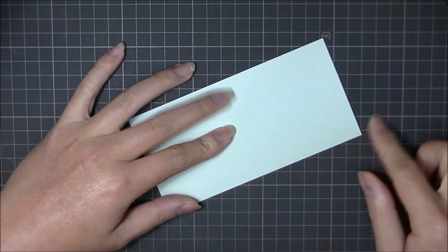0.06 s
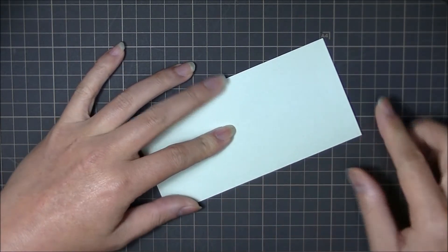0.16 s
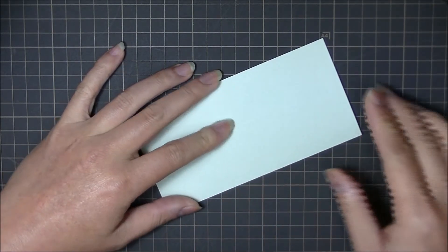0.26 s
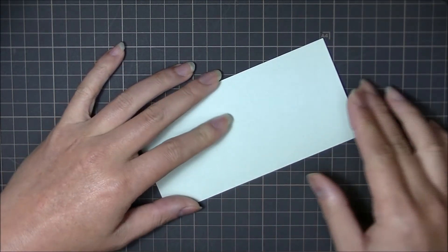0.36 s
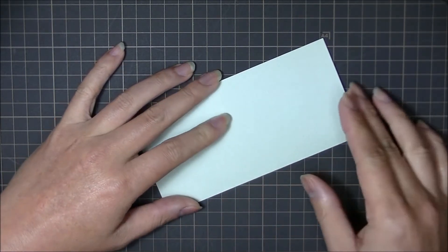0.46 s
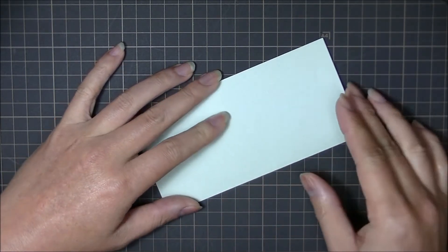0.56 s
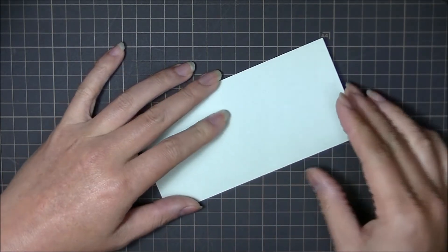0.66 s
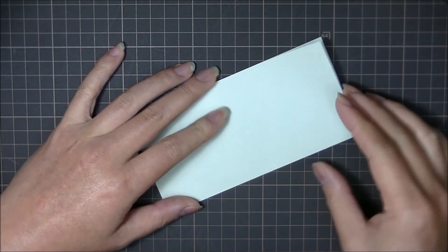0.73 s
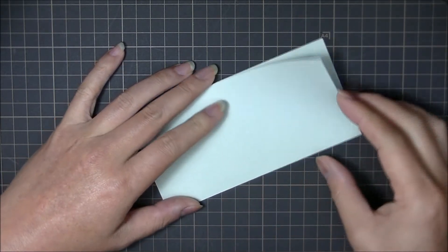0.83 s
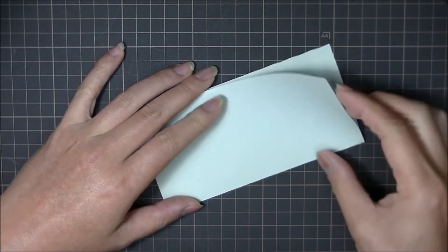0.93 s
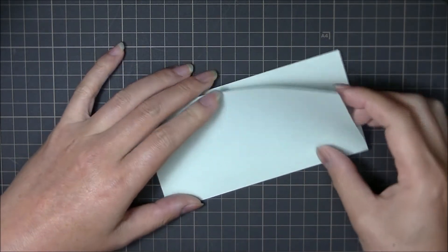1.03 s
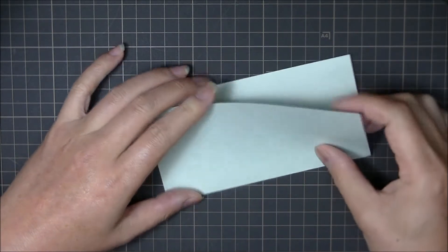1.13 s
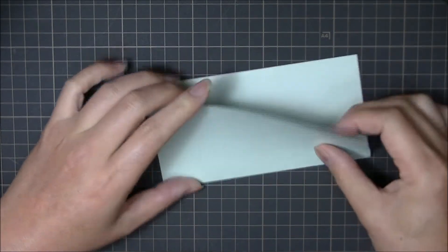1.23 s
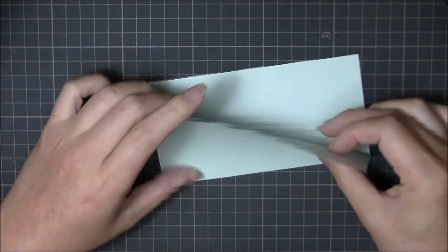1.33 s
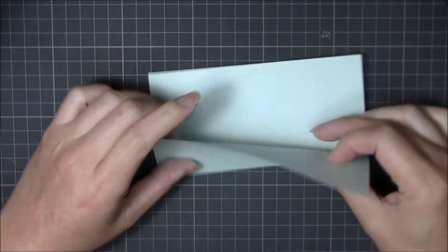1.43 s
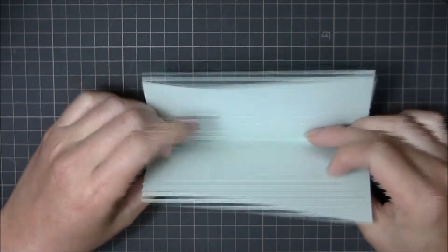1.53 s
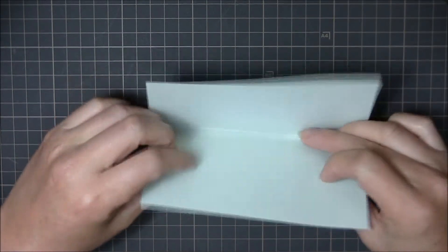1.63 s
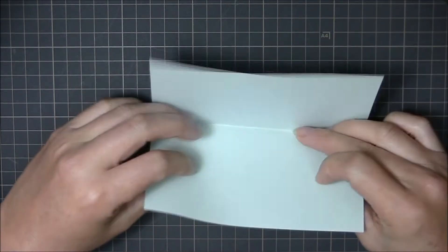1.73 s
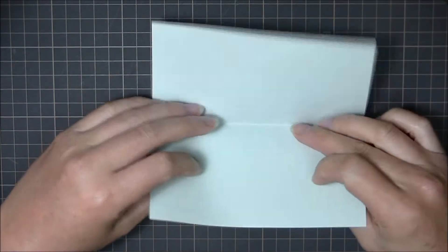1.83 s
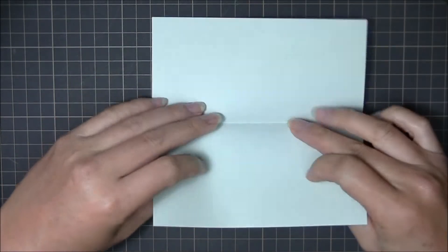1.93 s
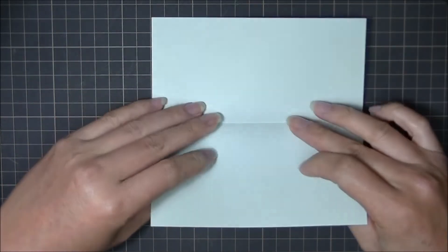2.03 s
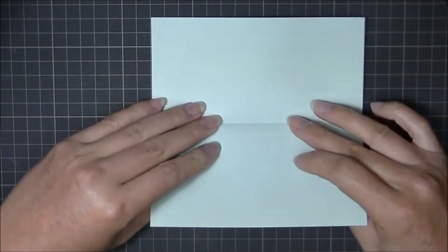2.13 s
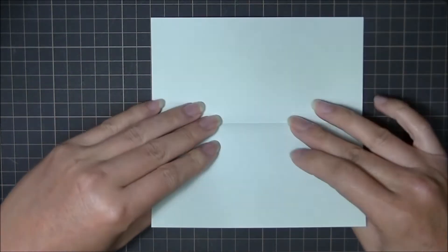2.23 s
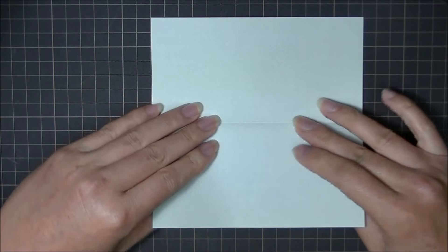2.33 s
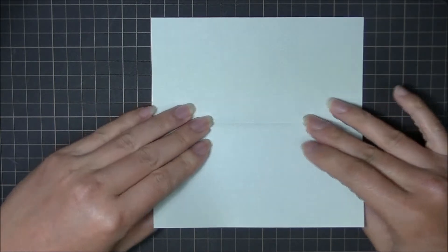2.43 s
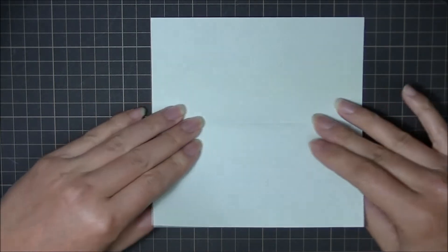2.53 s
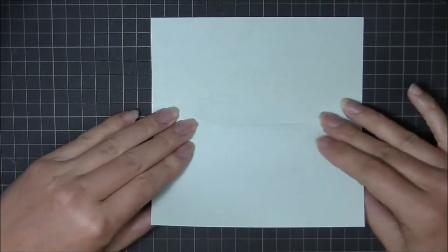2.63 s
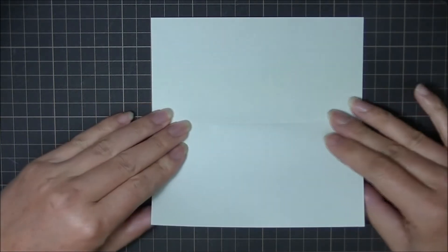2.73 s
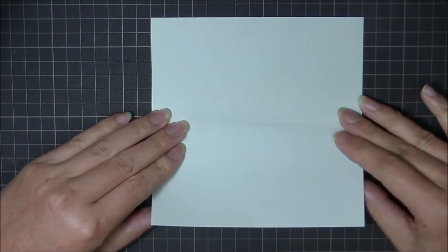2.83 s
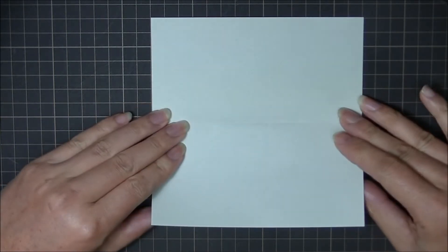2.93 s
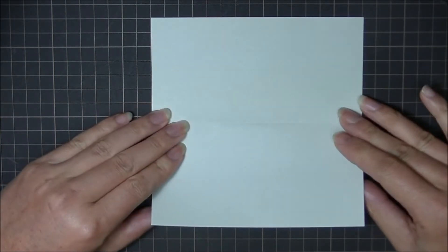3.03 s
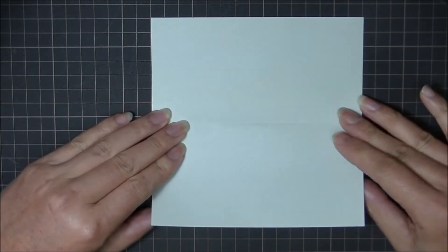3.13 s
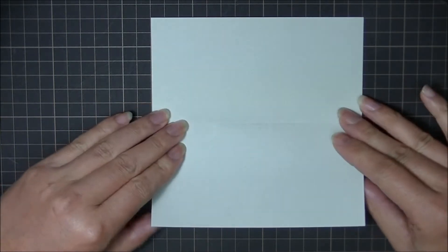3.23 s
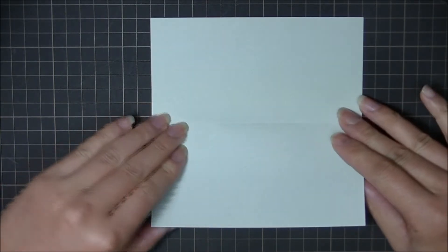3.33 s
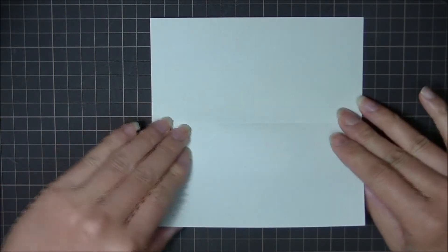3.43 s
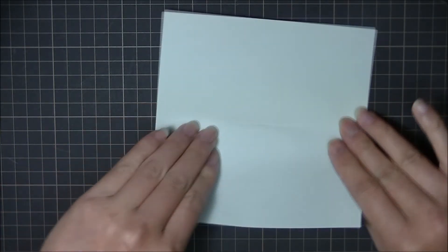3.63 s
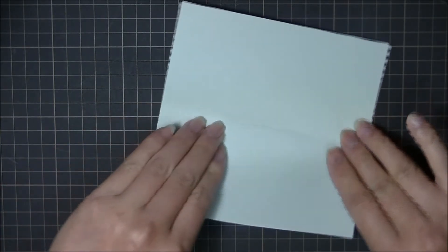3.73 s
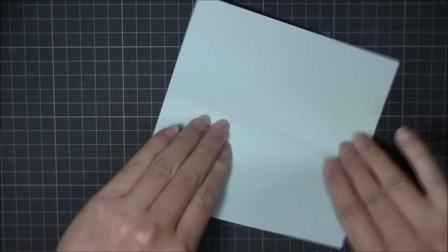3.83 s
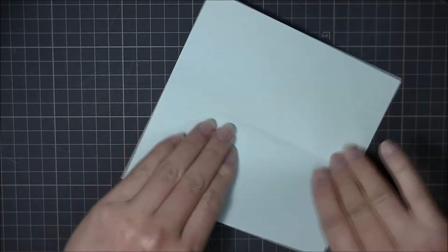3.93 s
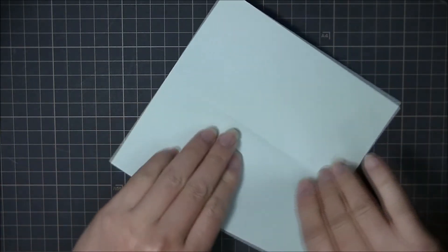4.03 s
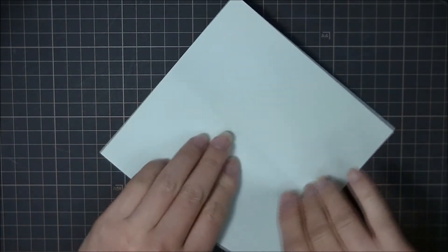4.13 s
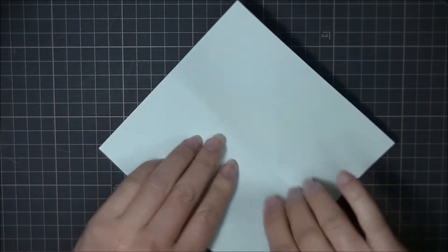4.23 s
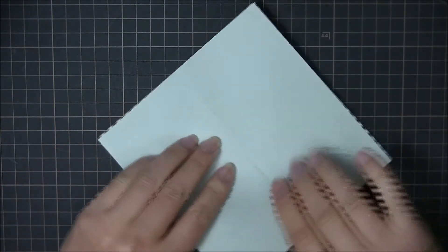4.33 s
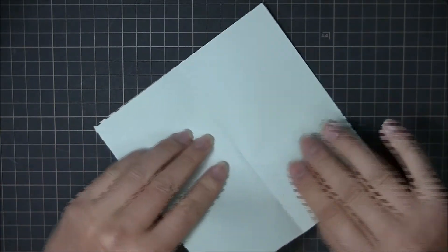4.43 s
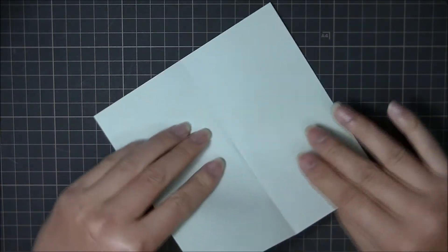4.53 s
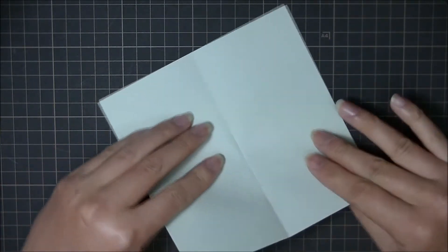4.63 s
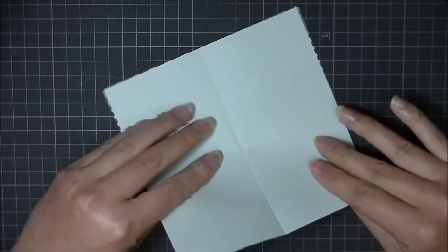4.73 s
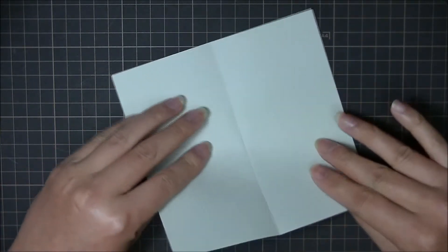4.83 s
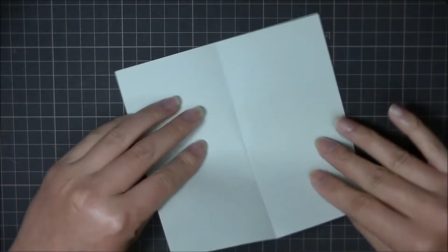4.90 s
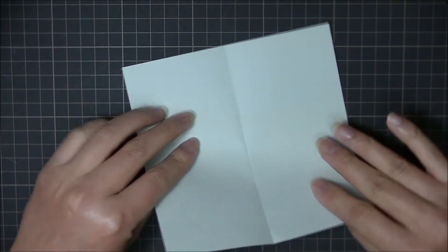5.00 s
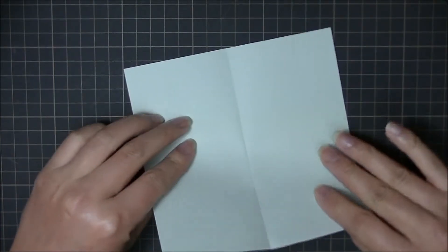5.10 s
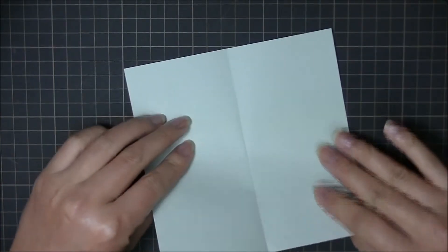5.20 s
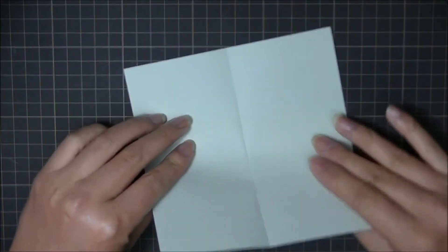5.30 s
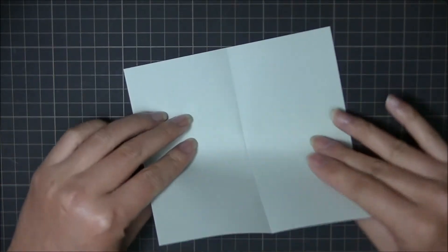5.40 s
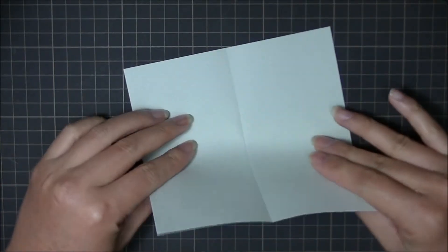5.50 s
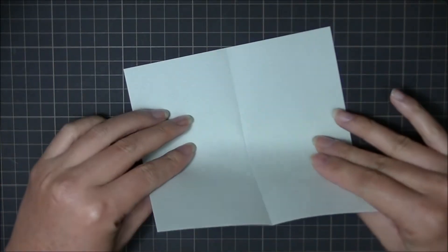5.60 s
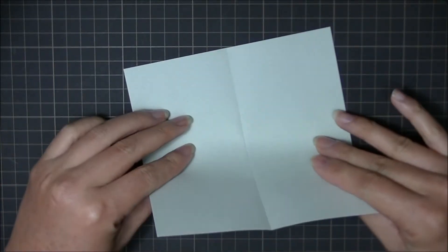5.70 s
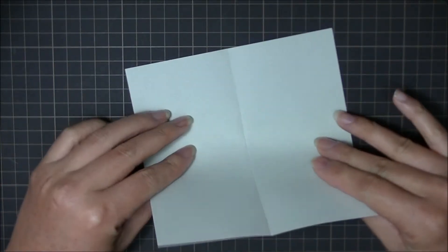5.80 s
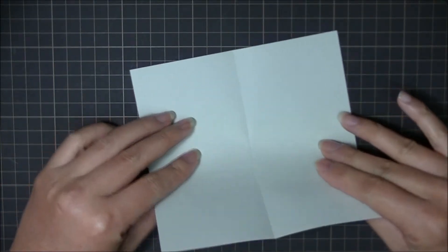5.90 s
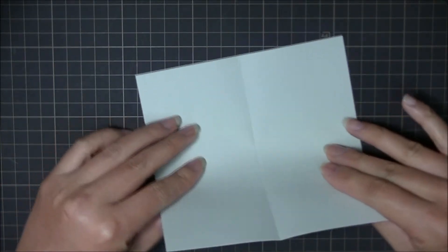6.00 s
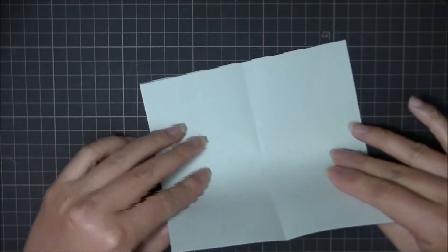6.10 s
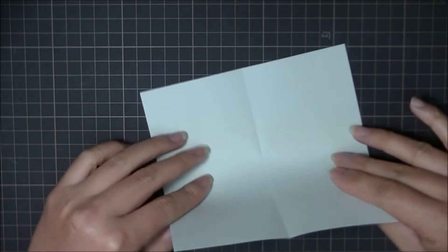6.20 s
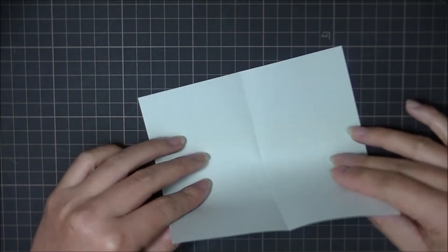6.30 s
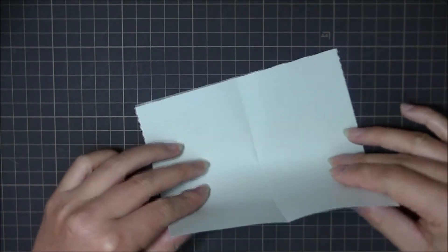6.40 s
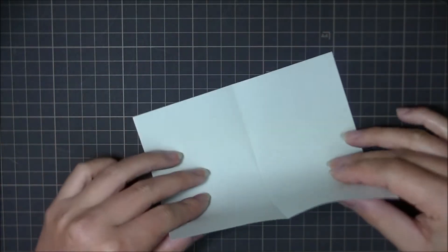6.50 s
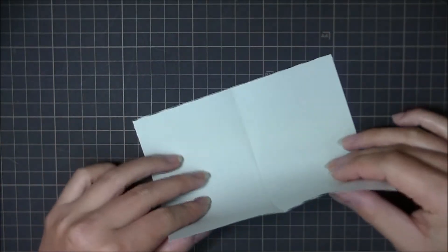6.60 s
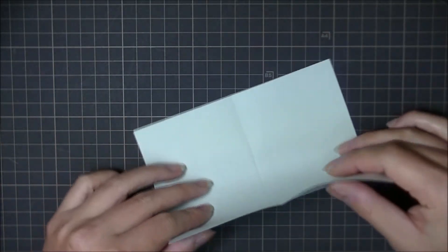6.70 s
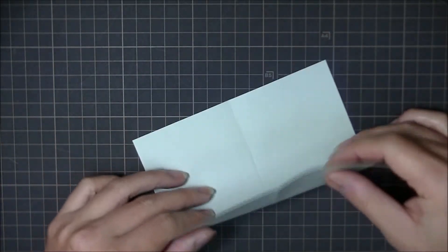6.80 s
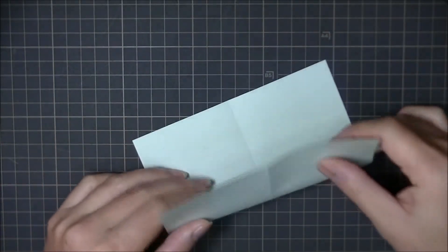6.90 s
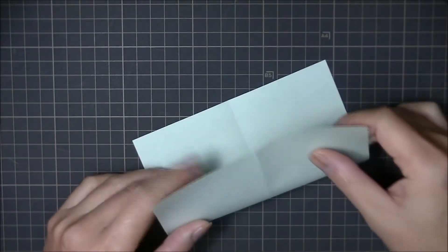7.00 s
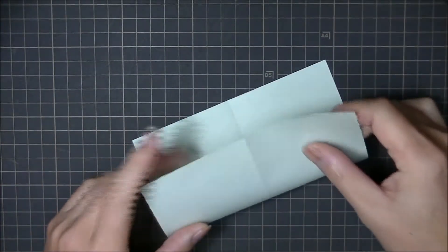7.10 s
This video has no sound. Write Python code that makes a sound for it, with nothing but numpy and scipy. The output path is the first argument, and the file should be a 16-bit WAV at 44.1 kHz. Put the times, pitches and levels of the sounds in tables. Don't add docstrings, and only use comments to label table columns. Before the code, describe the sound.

Crisp paper is rubbed, opened, turned on a mat and lifted to fold, rustling and crackling between soft pauses of microphone hiss.

```python
import sys
import numpy as np
from scipy import signal
from scipy.fft import rfft, irfft, next_fast_len
from scipy.io import wavfile
from scipy.ndimage import uniform_filter1d

SR = 44100
rng = np.random.default_rng(int(sys.argv[2]) if len(sys.argv) > 2 else 0)


def decibels_to_gain(level_db):
    exponent = np.asarray(level_db, float) / 20
    return 10 ** exponent


def to_wav(s):
    ch = np.atleast_2d(s).T
    pcm = np.round(np.clip(ch, -1, 1) * 32767)
    wavfile.write(sys.argv[1], SR, pcm.astype(np.int16))


N = 315315
SIZE = next_fast_len(N + 8192)
FREQ = np.maximum(np.arange(SIZE // 2 + 1) * SR / SIZE, 1)
USUAL_RASP_DB = -48


def rubbing(path):
    layer_edges = [1000, 2300, 6300]
    s, layers_db, rasp_hz, hiss_hz = strokes()
    sound = rfft(through(slips(count=N, spread_db=1.5), path), SIZE)
    power = np.abs(sound) ** 2 * 2 / SIZE / N
    layer_of = np.searchsorted(layer_edges, FREQ)
    time = np.arange(N) / SR
    step = np.log2(FREQ / 200) * 4
    grip = 0.29 * walk(30) + 0.63 * walk(90)
    out = 0
    for k in range(26):
        centre = np.searchsorted(step, k)
        layer = layer_of[centre]
        db = layers_db[layer] - 10 * np.log10(power[layer_of == layer].sum())
        lightness = np.clip(USUAL_RASP_DB - layers_db[2], -10, 20)
        span_peak = np.exp(-(np.log2(FREQ[centre] / rasp_hz) / 0.49) ** 2)
        db = db + (7.0 + 0.096 * lightness) * span_peak
        db = db + 6.6 * np.exp(-(np.log2(FREQ[centre] / hiss_hz) / 0.3) ** 2)
        db = db - 4.62 * (layer > 1)
        part = irfft(sound * np.clip(1 - np.abs(step - k), 0, 1), SIZE)[:N]
        flicker = 1.4 * walk(7) + 0.89 * walk(25)
        out = out + part * decibels_to_gain(np.interp(time, s, db) + grip + flicker)
    return out


def strokes():
    # (top [s], rasp [dB], rise [s], fall [s], press [dB])
    smoothing = [
        (0.123, -62, 0.011, 0.014, 6),
        (0.253, -53, 0.039, 0.05, 1),
        (.42, -62, 0.27, 0.13, 4),
        (.85, -69, 0.25, 0.45, -5),
    ]
    # (top [s], rasp [dB], rise [s], fall [s], press [dB])
    unfolding = [(1.04, -47, 0.02, 0.14, -8.5), (1.155, -45, 0.048, 0.079, -4.5),
                 (1.265, -46, 0.08, 0.059, -1.5), (1.39, -40, 0.038, 0.026, -2),
                 (1.49, -52.5, 0.049, 0.031, 6.5), (1.538, -39.5, 0.023, .05, 3),
                 (1.575, -38.5, 0.027, .025, 0), (1.615, -53.5, .02, 0.04, 12),
                 (1.703, -49, 0.033, .008, 2.5), (1.742, -40.5, 0.0098, 0.013, 8.5),
                 (1.80, -53.5, 0.046, 0.089, 5), (1.93, -49, 0.33, 0.048, -4),
                 (2.052, -46, 0.082, 0.045, 1), (2.13, -53, 0.044, 0.091, 2)]
    # (top [s], rasp [dB], rise [s], fall [s], press [dB])
    flattening = [
        (2.42, -58, 0.05, 0.18, -5),
        (2.55, -56, 0.21, 0.15, -10.5),
        (2.78, -62.5, 0.17, 0.14, -5.5),
    ]
    # (top [s], rasp [dB], rise [s], fall [s], press [dB])
    turning = [
        (3.6, -51, 0.093, .12, -11),
        (3.74, -50.5, 0.11, 0.095, 4),
        (3.95, -47.5, 0.22, 0.32, 1),
        (4.108, -40, 0.16, .1, -2.5),
        (4.295, -46.5, 0.057, 0.055, 5),
        (4.46, -48, 0.094, 0.12, 5),
        (4.58, -48.5, 0.062, 0.04, 5),
        (4.70, -44.5, 0.14, 0.062, 0.5),
    ]
    # (top [s], rasp [dB], rise [s], fall [s], press [dB])
    lifting = [(5.87, -60, 0.05, 0.16, 5.3), (6.07, -44.5, 0.12, 0.16, 2.4), (6.3, -50, .08, 0.092, 1.03),
               (6.49, -47.5, 0.099, 0.068, 4.9), (6.67, -53.5, 0.029, 0.14, 9),
               (6.761, -43.5, 0.045, 0.047, 3.8), (6.81, -48.5, 0.04, 0.034, 9.2),
               (6.915, -55.5, 0.068, 0.055, 4), (6.2, -50.5, 0.031, 0.062, 8.8),
               (6.59, -58.5, .03, 0.04, 10)]
    # (top [s], rasp [dB], rise [s], fall [s], press [dB])
    nudging = [
        (3.285, -61, 0.033, 0.085, -4),
        (3.39, -55, 0.035, 0.051, -8),
        (3.47, -54.5, 0.022, 0.14, -5),
    ]
    # (top [s], rasp [dB], rise [s], fall [s], press [dB])
    raising = [
        (7.07, -60.5, 0.12, .08, 0),
        (7.125, -58.5, 0.053, 0.027, 0),
    ]
    # (top [s], rasp [dB], rise [s], fall [s], press [dB])
    settling = [
        (4.85, -50, 0.068, 0.12, -2),
        (5.0, -52, 0.072, 0.23, 0),
        (5.24, -55.5, 0.18, 0.066, -0.21),
        (5.38, -62.5, 0.057, 0.11, 0.26),
        (5.56, -68, 0.12, 0.2, 0),
    ]
    # (table hum [dB], sheet flex [dB], skin hiss [dB], hiss centre [Hz], roundness of the top [1])
    voices = [
        (-58, -56.5, -61, 9000, 1.6),
        (-63, -52.5, -60.5, 7800, 1),
        (-63, -51, -55.5, 10800, 1.9),
        (-66, -54, -56, 7840, 1.35),
        (-62.5, -54, -57.5, 9500, 1.39),
        (-67, -57.5, -67, 9500, 1),
        (-62, -50, -51, 10500, 1.5),
        (-63.5, -53.5, -55, 9500, 1.27),
    ]
    # (time [s], rasp centre [Hz])
    free_span = [(0, 3470), (.25, 2950), (.52, 3960), (.9, 4330), (1.02, 3400), (1.39, 3770), (1.6, 3050),
                 (1.71, 3840), (1.76, 2980), (2.6, 3400), (3.4, 3000), (3.6, 3540), (4.2, 3660),
                 (4.7, 3180), (4.86, 3680), (5.15, 3040), (6.9, 3600), (7.1, 4200)]
    # (gap [s], depth [dB], drop [s], return [s])
    lulls = [(1.012, 5, 0.027, .002), (1.292, 3, .003, .03), (1.965, 2, .008, .025), (2.615, 4, .008, .015),
             (3.425, 6, .004, .03), (4.318, 9, .003, .012), (4.615, 5.5, 0.0073, 0.0073),
             (4.945, 3, 0.012, 0.011), (5.14, 3, 0.025, .008), (5.31, 4, .004, 0.027),
             (5.836, 8, .03, .002), (1.43, 4, .004, .03), (4.235, 3, 0.011, 0.011)]
    s = np.arange(0, N / SR + .002, .002)
    power = np.full((4, len(s)), 1e-12)
    hiss_pull = 1e-12 * 9000
    gestures = (smoothing, unfolding, flattening, turning, lifting, nudging, raising, settling)
    for rows, (hum_db, flex_db, hiss_db, hiss_hz, roundness) in zip(gestures, voices):
        for top, rasp_db, rise, fall, press_db in rows:
            away = np.abs(s - top) / np.where(s < top, rise, fall)
            effort = rasp_db - USUAL_RASP_DB - 10 * away ** roundness
            hum = hum_db + 0.71 * effort + 0.98 * press_db
            flex = flex_db + 0.96 * effort + 0.98 * press_db
            rasp = USUAL_RASP_DB + effort
            skin = hiss_db + 0.95 * effort
            layers = decibels_to_gain(2 * np.array([hum, flex, rasp, skin]))
            power = power + layers
            hiss_pull = hiss_pull + layers[3] * hiss_hz
    lull_db = 0
    for at, db, drop, back in lulls:
        lull_db = lull_db + db * np.exp(-((s - at) / np.where(s < at, drop, back)) ** 2)
    rasp_hz = np.interp(s, *np.array(free_span).T)
    return s, 10 * np.log10(power) - lull_db, rasp_hz, hiss_pull / power[3]


def patchy(x, spread_db):
    cells = signal.stft(x, nperseg=1024)[2]
    patch = uniform_filter1d(rng.standard_normal(cells.shape), size=3, axis=0)
    patch = uniform_filter1d(patch, size=3, axis=1)
    gain_db = spread_db * (patch / patch.std() - spread_db * np.log(10) / 20)
    return signal.istft(cells * decibels_to_gain(gain_db), nperseg=1024)[1][:N]


def scrapes(path):
    # (top [s], peak [dB],
    # centre [Hz], rise [s], fall [s])
    edge_drags = [(1.030, -35, 3420, 0.0011, 0.014), (1.043, -35.5, 3870, 0.0065, 0.0068),
                  (1.111, -31.5, 4140, .001, 0.052), (1.127, -29.5, 3600, 0.0083, .0077),
                  (1.147, -28, 2100, 0.0025, 0.0069), (1.174, -31, 4200, .0044, 0.0044),
                  (1.361, -33.5, 4300, 0.015, 0.025), (1.392, -31.5, 2180, 0.0092, 0.03),
                  (1.569, -18.5, 3400, 0.013, 0.014), (1.58, -17.5, 1180, 0.0025, 0.01),
                  (1.706, -34, 2200, 0.0021, 0.0037), (1.741, -29, 2570, .0055, 0.004),
                  (1.752, -27, 1900, .006, 0.0013), (1.935, -36.5, 4000, .0073, 0.011),
                  (1.999, -38.5, 3200, .002, 0.024), (2.115, -38, 1900, .0008, 0.009),
                  (1.698, -44.5, 10500, 0.02, .006), (1.53, -46, 9400, 0.0062, 0.038),
                  (1.635, -41, 1280, .015, .03), (1.255, -34, 3350, 0.023, 0.027),
                  (0.269, -35.5, 2800, 0.015, .0074), (.325, -47.5, 3800, 0.01, 0.011),
              (.39, -48, 4080, .015, 0.032), (.472, -51, 4100, .01, 0.021), (.5, -49.5, 4230, 0.018, 0.013),
              (0.876, -51, 4340, 0.016, 0.047), (3.282, -57, 3120, .01, .02),
              (3.465, -48, 2910, .0071, 0.056), (4.407, -34, 3400, 0.009, 0.011),
              (4.634, -35, 3030, .008, .031), (4.86, -39.5, 5000, 0.025, 0.013),
              (5.251, -42, 3300, .0072, .011), (5.251, -45, 9250, 0.011, 0.0079),
              (5.415, -55, 9300, .006, 0.0081), (5.72, -50, 3740, 0.0053, .0089),
              (5.84, -49, 1500, .0022, 0.033), (6.895, -36.5, 2090, 0.013, .016),
              (7.131, -33.5, 2980, 0.0021, 0.0034), (7.138, -33, 810, 0.0045, 0.0064),
              (2.595, -42, 3300, 0.0094, 0.0038), (3.38, -48, 3060, 0.013, 0.028),
              (3.311, -53, 3500, 0.0088, .01), (.24, -54.5, 10200, .045, .025),
              (7.126, -35, 5200, .002, 0.0074)]
    # (top [s], peak [dB], centre [Hz], rise [s], fall [s])
    on_table = [(.22, -47.5, 775, 0.035, .04), (.35, -47.5, 880, .04, .05), (.5, -54.5, 870, .03, .03),
                (1.139, -42, 600, 0.012, 0.022), (1.401, -45.5, 440, 0.0067, 0.029),
                (1.757, -36, 530, .012, 0.015), (1.83, -44, 330, .03, 0.052),
                (4.253, -34.5, 430, 0.0014, 0.01), (6.9, -44, 480, 0.022, 0.024),
                (7.146, -49, 300, .008, .02)]
    # (top [s], peak [dB], centre [Hz], rise
    # [s], fall [s])
    further_drags = [(2.55, -47, 4000, 0.038, 0.022), (2.645, -50, 3500, .012, .015),
                     (3.4, -48.5, 2900, .025, .012), (3.97, -37.5, 3250, .04, .04),
                     (4.075, -31, 3300, .03, 0.037), (4.46, -39, 1700, 0.023, 0.033),
                     (1.84, -40, 1850, .03, 0.027), (2.05, -48, 12500, .03, 0.027), (1.585, -36, 9100, .02, .008),
                     (1.425, -35, 2000, 0.011, 0.011), (5.17, -46, 1650, .015, .03), (4.46, -52, 12000, .03, .02),
                     (1.59, -28, 3100, .005, .008), (1.047, -36, 3400, .004, 0.0022),
                     (1.737, -30.5, 3500, .004, .005), (.79, -56, 4700, .012, .015), (2.45, -55, 1600, .04, .05),
                     (.43, -54, 860, .04, .05), (3.8, -50, 8000, .045, .06), (3.62, -53, 8000, .045, .06)]
    out = np.zeros(N + 8192)
    t = np.arange(-2048, 4096) / SR
    for s, db, hz, rise, fall in edge_drags + on_table + further_drags:
        grit = through(slips(count=len(t), spread_db=2.0), path)
        broad = signal.lfilter(*signal.butter(2, min(2.74 * hz, SR / 2.5), fs=SR), grit)
        grit = level(broad, -7) + level(band(grit, hz, 0.19 * hz), 0)
        swell = np.where(t < 0, np.exp(-(t / rise) ** 2), np.exp(-np.abs(t) / fall))
        at = int(s * SR)
        out[at:at + len(t)] += level(grit, db - 9) * swell
    return out[2048:N + 2048]


def snaps(path):
    # (time [s], peak [dB], ring [Hz], thud [dB], decay [s])
    creases = [(1.7235, -12.5, 4200, -24, 0.014), (1.7234, -24, 1700, -32, .014),
               (1.7236, -31, 7300, -30, 0.0066), (1.7275, -29, 5200, -30, .008),
               (4.2491, -16, 1700, -12, 0.016), (4.2502, -17.5, 3410, -34, 0.017),
               (4.2542, -22.5, 1530, -7.5, 0.026), (4.2585, -27.5, 1450, -6, .03),
               (5.6976, -40, 4060, -29, .03), (6.8812, -31.5, 4270, -26, .025),
               (6.882, -38, 2000, -23, 0.013), (6.888, -36, 3340, -9, 0.016),
               (1.6606, -42, 1390, -24, 0.024), (7.1246, -38, 10300, -30, 0.034)]
    # (time [s], peak [dB], ring [Hz])
    ticks = [(.387, -39.5, 3700), (.4014, -40, 3500), (0.7803, -47, 5200), (0.7957, -45, 4500),
             (1.1268, -23, 3900), (1.1243, -25, 3900), (1.047, -33, 3600), (1.2, -29, 3900),
             (1.148, -30, 4500), (1.133, -30, 3600), (1.4, -30, 3500), (1.7, -38, 4400), (2.071, -38, 3300),
             (2.032, -36, 3600), (2.163, -42, 4000), (3.3165, -48, 3500), (.4365, -46, 3900),
             (.472, -45, 4100), (0.6, -50, 4000), (1.601, -31, 1900), (1.5635, -26, 2500),
             (1.3608, -30, 4000), (1.8118, -39, 10000), (2.1305, -42, 9600), (2.245, -44.5, 3140),
             (4.322, -36, 3400), (4.5989, -33.5, 1580), (5.4555, -51, 3500), (5.461, -52, 3500),
             (5.4965, -40, 4000), (5.3856, -45, 4300), (6.8807, -37, 8700), (6.89, -33, 11000),
             (6.9046, -41, 9000), (1.7878, -40, 2500), (5.3707, -41, 3700), (6.911, -44, 9500),
             (1.7055, -39, 10000), (1.705, -32, 2000), (.122, -51, 12000), (.838, -54, 4650)]
    # (time [s], peak [dB], ring [Hz])
    taps = [
        (2.1131, -35.5, 1870),
        (5.1488, -47.5, 900),
        (6.9803, -48.5, 1290),
    ]
    events = [(*row, 0.83) for row in creases]
    events += [(*row, -21, 0.0092, 0.34) for row in ticks]
    events += [(*row, -1.5, 0.023, 0.34) for row in taps]
    lean_db = np.array([[1], [-1]]) / 2
    out = np.zeros((2, N + 4096))
    t = np.arange(4096) / SR
    for s, db, hz, thud_db, t60, share in events:
        push = slips(count=len(t), spread_db=0.5) * np.exp(-np.log(1000) * t / t60) * 0.17
        push[0] += 1.5
        soft = signal.butter(3, [.5 * hz, min(1.7 * hz, SR / 2.6)], "band", fs=SR)
        crack = through(signal.lfilter(*soft, push), path)
        ring = band(band(crack, hz, 0.3 * hz), hz, 0.45 * hz)
        thud = band(band(through(push, path), 407, 270), 720, 1000)
        body = (1 - share) * crack / np.abs(crack).max() + share * ring / np.abs(ring).max()
        body = body / np.abs(body).max() + decibels_to_gain(thud_db) * thud / np.abs(thud).max()
        at = int((s + .0004) * SR)
        out[:, at:at + len(t)] += body * decibels_to_gain(db + lean_db)
    return out[:, :N]


def slips(count, spread_db):
    size = decibels_to_gain(spread_db * np.minimum(rng.exponential(size=count // 24 + 1), 4))
    return rng.standard_normal(count) * np.repeat(size, 24)[:count]


def path_response():
    # (frequency [Hz], level [dB per Hz])
    path_colour = [(90, -63), (200, -32), (420, -21), (850, -8.5), (1300, -3.5), (1800, 1), (2200, -3),
                   (3300, -1), (5400, -3.5), (6500, -11.5), (7500, -8), (11000, -12.5), (14500, -17.5),
                   (15800, -32)]
    hz = np.maximum(np.arange(2049) * SR / 4096, 1)
    cepstrum = irfft((colour_db(path_colour, hz) + rings_db(hz)) * np.log(10) / 20)
    cepstrum[1:2048] *= 2
    cepstrum[2049:] = 0
    return irfft(np.exp(rfft(cepstrum)))


def rings_db(hz):
    # (frequency [Hz], width [Hz], boost [dB])
    ring_list = [(293, 44, 5.5), (496, 39, 9), (646, 12.4, -14), (760, 10.8, 11), (880, 29, 0),
                 (1064, 9.2, 8), (1151, 16, 2), (1252, 44, 6.5), (1400, 57, -1), (1470, 87, 4),
                 (1700, 57, 3), (1928, 32, 4.5), (2280, 100, -2), (2354, 42, 4), (3030, 240, 1.5),
                 (3300, 45, -1.5), (3580, 27, 2), (3870, 490, -2.5), (5430, 49, 2), (5410, 88, -2.5)]
    return sum(boost_db / (1 + (2 * (hz - f) / w) ** 2) for f, w, boost_db in ring_list)


def through(x, path):
    return signal.fftconvolve(x, path)[:len(x)]


def housing(x):
    n = np.arange(256)
    scatter = rng.standard_normal(256) * np.exp(-n / 110.0) * (n > 6)
    treble = band(band(x, 8000, 3300), 8000, 3300)
    scattered = np.convolve(treble, scatter / np.linalg.norm(scatter))[:N]
    return decibels_to_gain(-3) * scattered * np.array([[1], [-1]])


def room(x):
    t60 = 0.079
    t = np.arange(SR // 4) / SR
    tail = rng.standard_normal((2, len(t))) * np.exp(-np.log(1000) * t / t60) * (t > .003)
    tail = signal.lfilter([1], [1, -.6], tail)
    tail = tail * decibels_to_gain(-20.5) / np.sqrt((tail ** 2).sum(1, keepdims=True))
    return signal.fftconvolve(x[None], tail, axes=1)[:, :N]


def hiss():
    # (frequency [Hz], level [dB per Hz])
    mid_colour = [(12, -46), (20, -19), (214, -15.5), (246, -12.5), (307, -7), (537, -5.5), (652, -1.5),
                  (750, -3.5), (1020, -3), (1240, -4.5), (1460, -3), (1930, -7), (4340, -12), (4720, -12.5),
                  (15600, -20)]
    # (frequency [Hz], level [dB per Hz])
    side_colour = [(12, -47), (20, -17.5), (260, -17), (307, -9), (395, -10), (652, -6), (815, -9.5),
                   (886, -8), (1640, -13), (2350, -16), (2860, -16.5), (12200, -27.5), (15600, -30)]
    mid, side = [
        irfft(rfft(rng.standard_normal(SIZE)) * decibels_to_gain(colour_db(points, FREQ) + 0.19 * rings_db(FREQ)), SIZE)[:N]
        for points in (mid_colour, side_colour)]
    return level(mid, -65.5) + level(side, -64.5) * np.array([[1], [-1]])


def level(x, db):
    return x * decibels_to_gain(db) / np.sqrt(np.mean(x ** 2))


def colour_db(points, hz):
    point_hz, point_db = np.array(points).T
    return np.interp(np.log(hz), np.log(point_hz), point_db)


def walk(rate):
    k = int(SR / rate)
    held = np.repeat(rng.standard_normal(N // k + 1), k)
    return 0.92 * uniform_filter1d(uniform_filter1d(held, k), k)[:N]


def band(x, hz, width):
    return signal.lfilter(*signal.iirpeak(min(hz, SR / 2.5), hz / width, SR), x)


def scene():
    path = path_response()
    lean = decibels_to_gain(np.array([[1.3], [-1.3]]) / 2)
    paper = (patchy(rubbing(path), spread_db=2.0) + scrapes(path)) * lean + snaps(path)
    centre = paper.mean(0)
    return paper + housing(centre) + room(centre) + hiss()


def band_limit(x):
    return signal.sosfilt(signal.butter(12, 15700, fs=SR, output="sos"), x)


def record(dry):
    top = signal.butter(4, Wn=14500, fs=SR)
    return band_limit(signal.lfilter(*top, dry))


dry = scene()
out = record(dry)
to_wav(out)
```